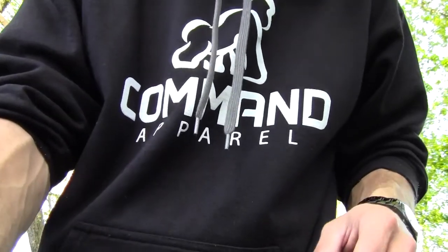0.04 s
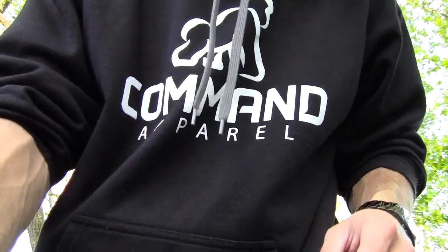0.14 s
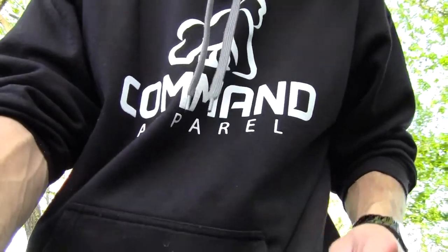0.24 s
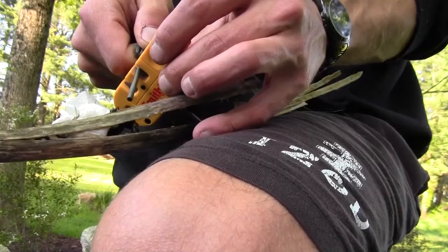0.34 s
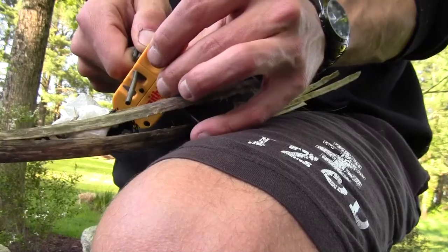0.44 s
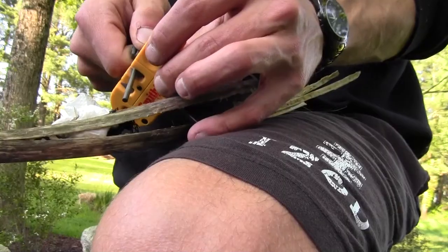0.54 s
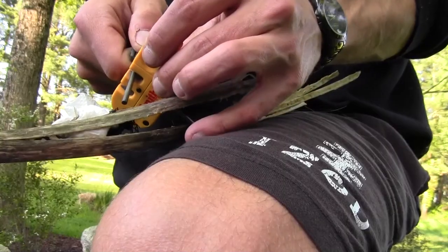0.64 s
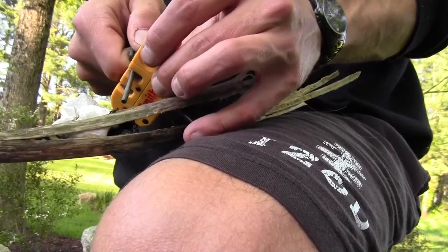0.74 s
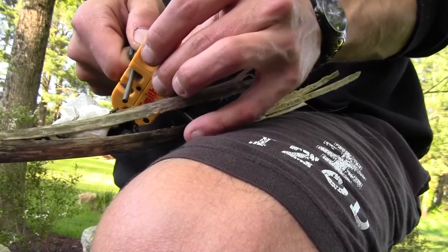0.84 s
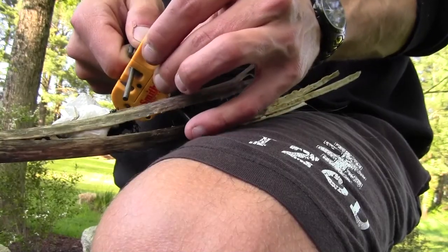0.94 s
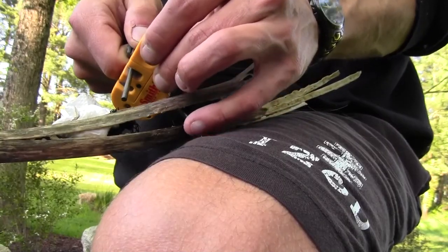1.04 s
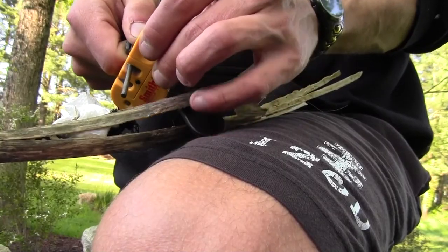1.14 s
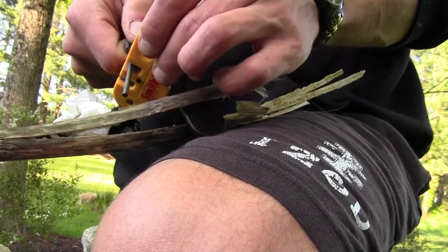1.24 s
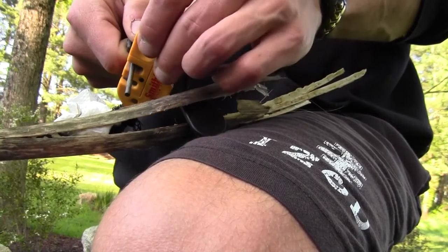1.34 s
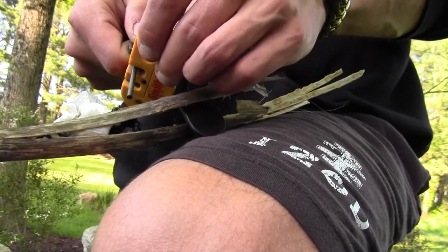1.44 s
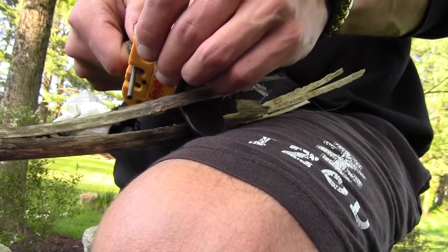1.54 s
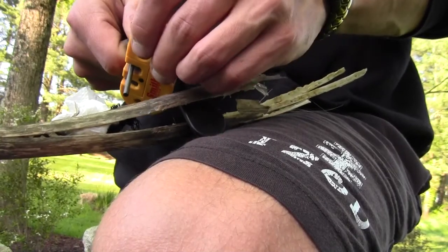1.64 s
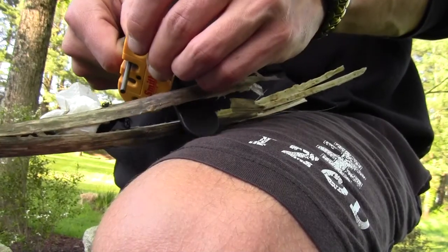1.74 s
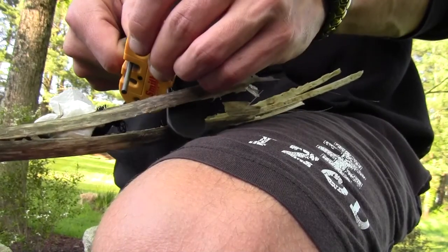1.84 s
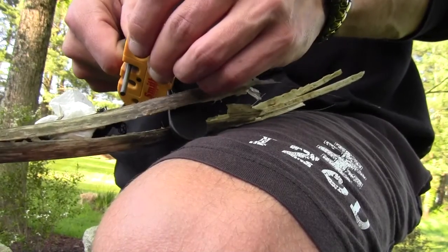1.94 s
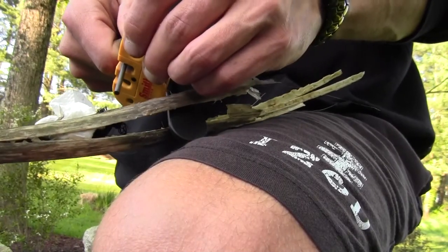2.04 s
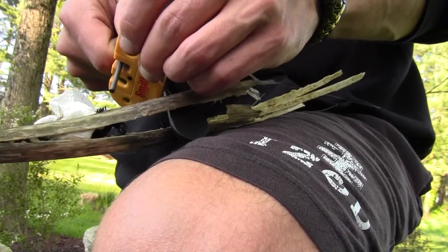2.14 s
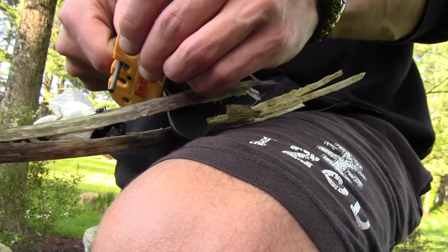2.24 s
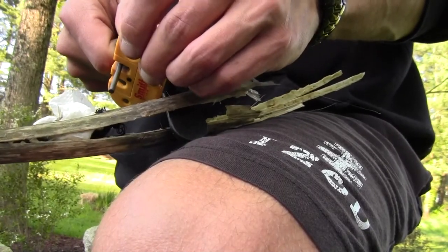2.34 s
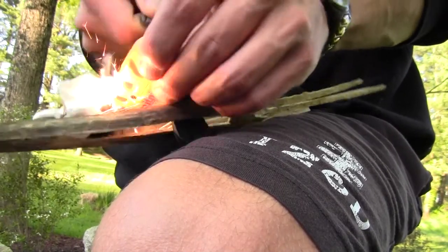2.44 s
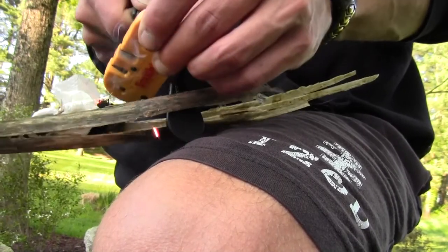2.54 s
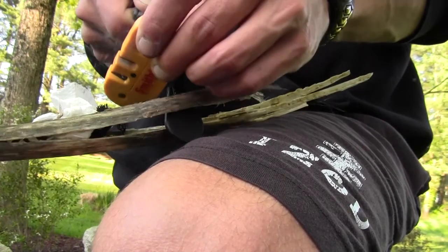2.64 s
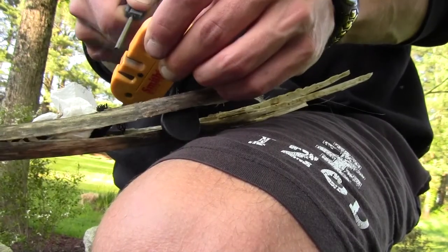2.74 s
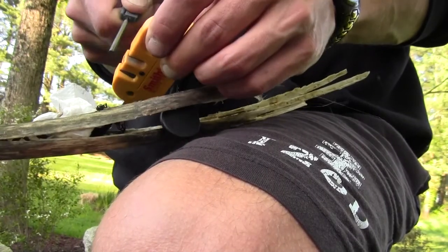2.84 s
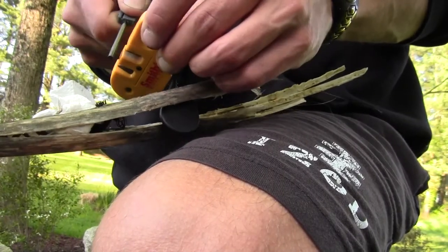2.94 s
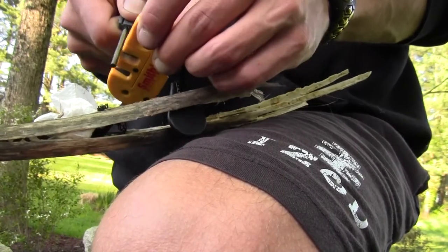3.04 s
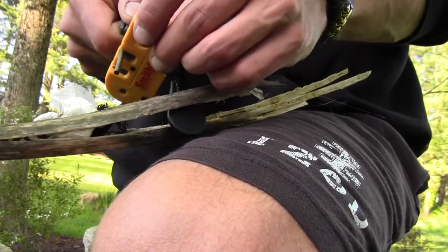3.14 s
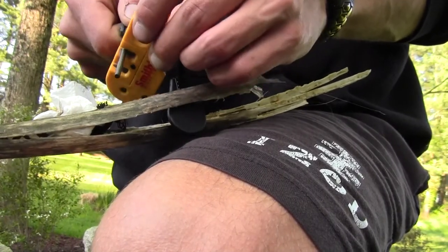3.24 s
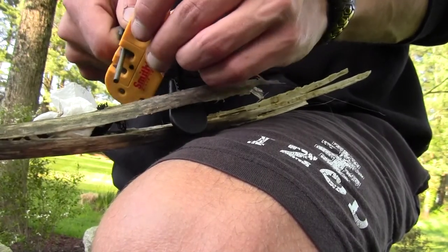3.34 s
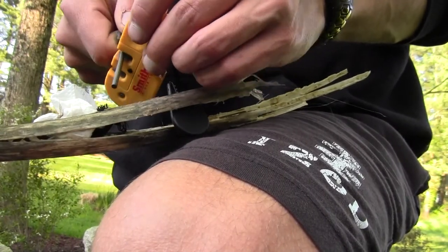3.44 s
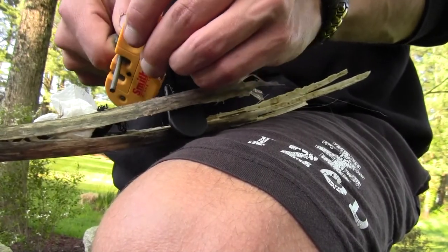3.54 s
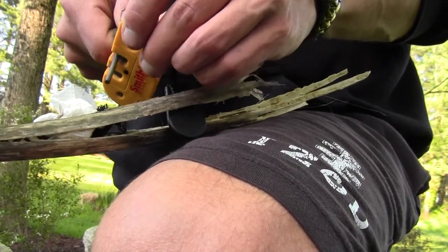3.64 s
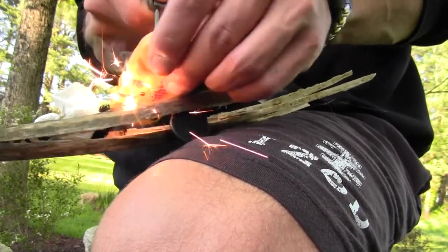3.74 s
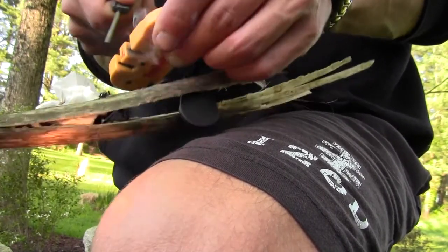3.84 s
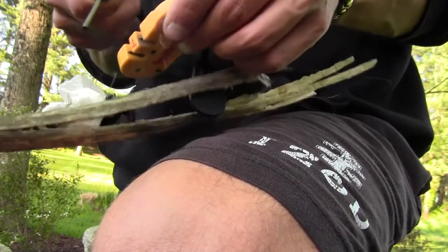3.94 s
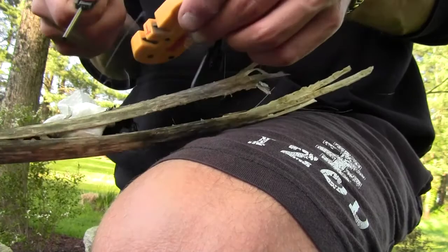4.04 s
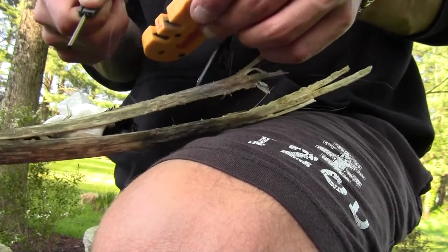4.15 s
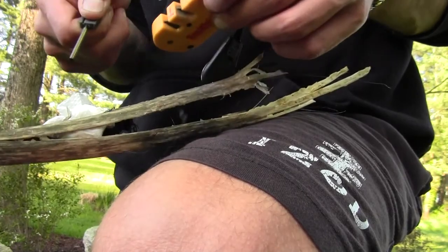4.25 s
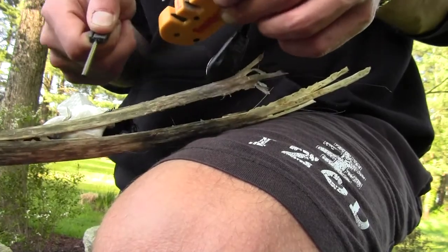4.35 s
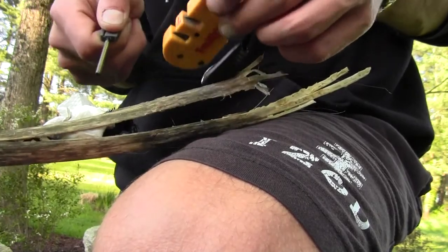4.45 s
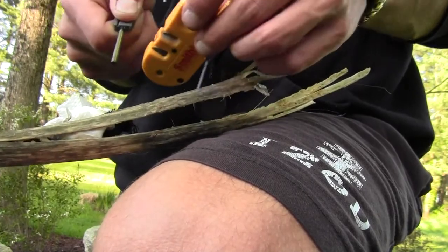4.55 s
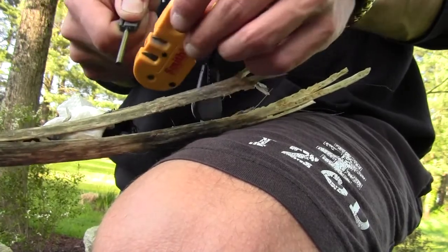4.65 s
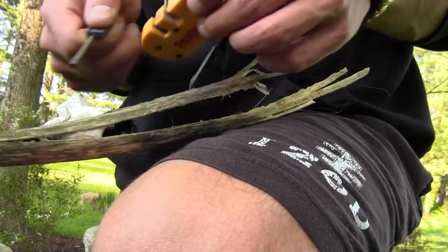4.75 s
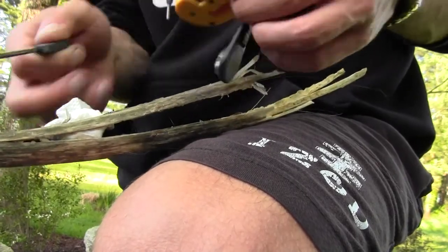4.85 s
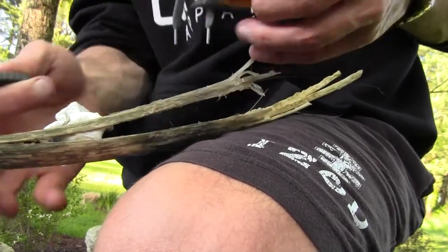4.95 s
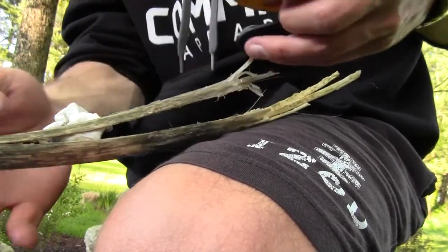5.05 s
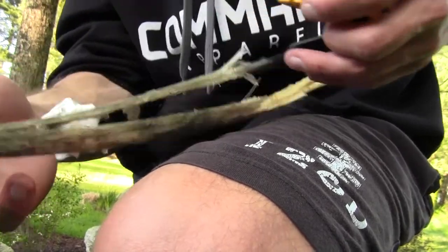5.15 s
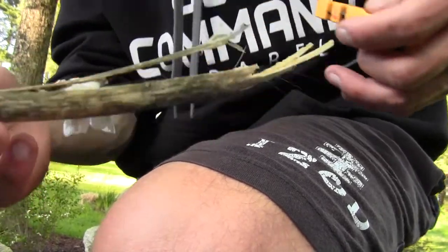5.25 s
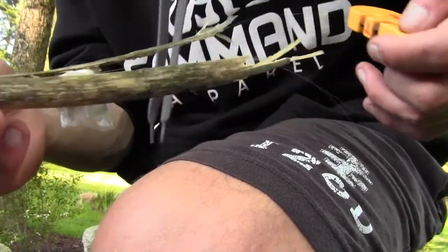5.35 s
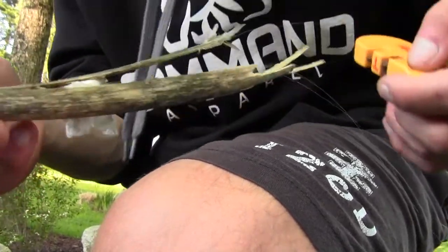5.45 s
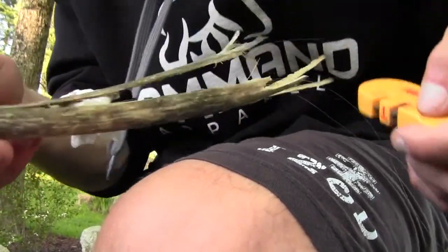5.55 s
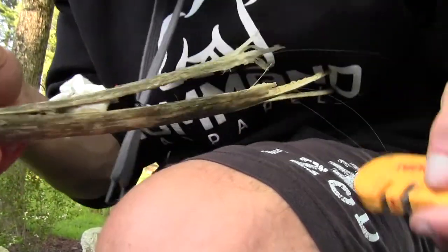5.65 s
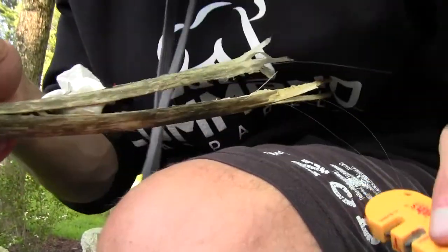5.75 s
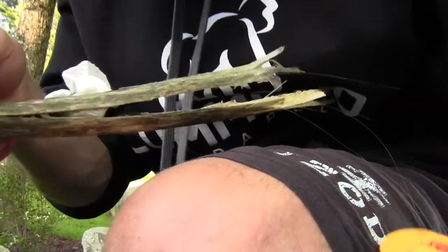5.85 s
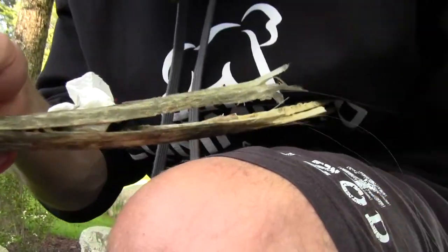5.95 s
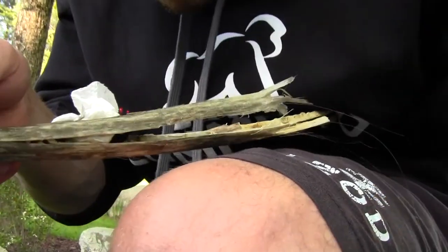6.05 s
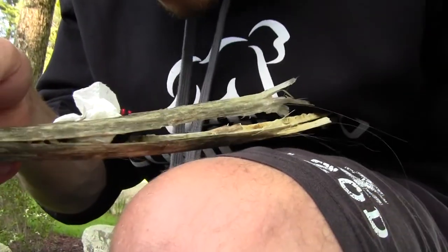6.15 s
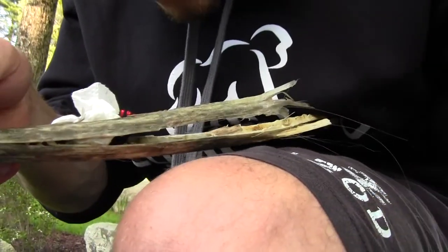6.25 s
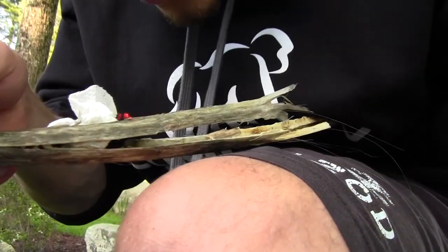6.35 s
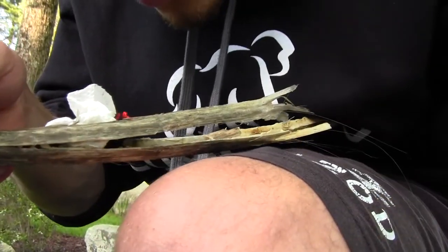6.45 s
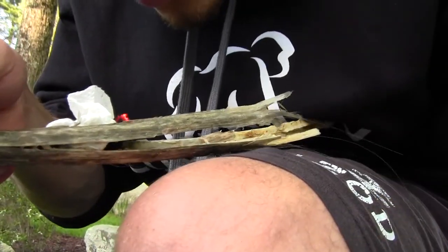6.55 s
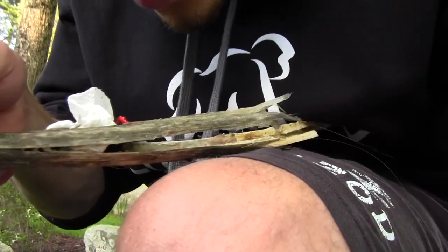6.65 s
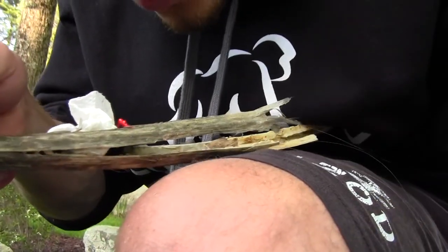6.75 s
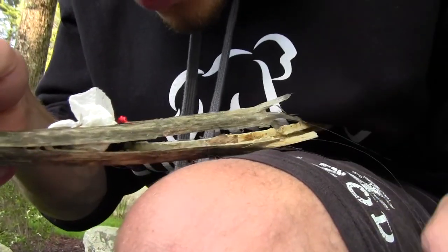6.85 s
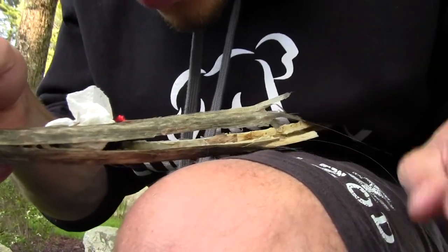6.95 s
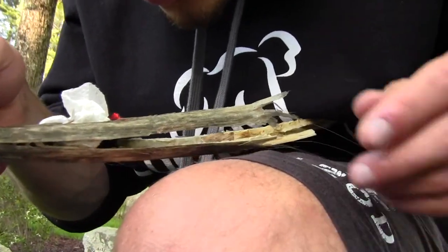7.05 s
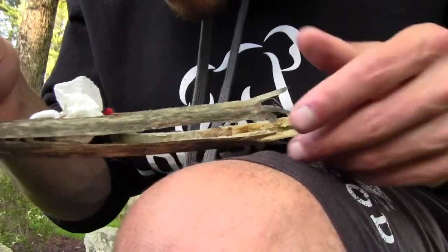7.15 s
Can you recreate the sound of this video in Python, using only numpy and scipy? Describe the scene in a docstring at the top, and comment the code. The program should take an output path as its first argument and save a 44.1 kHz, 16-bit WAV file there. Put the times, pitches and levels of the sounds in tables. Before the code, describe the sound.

Hands click and rustle a metal tool against dry bark outdoors, two harsh scrapes on a fire rod, then sharp knocks over faint birds.

```python
"""A wood with far traffic rumble, leaf hiss and whistling birds; the background steps down at 0.4 and 5 s.
From 0.4 s on, fingers, tool and dry bark rustle and click close to the microphone: noise and short chatter
ring the tool and the bark. At 2.4 and 3.7 s a steel edge scrapes hard down a fire rod, throwing sparks:
uneven slips ring the same bodies and add bright fizz. Dull knocks on the bark join in from 2.5 s;
rustles, clicks and knocks go on to the end, with the hardest blows at 5.0, 6.2, 6.6 and 6.9 s."""
import sys
import numpy as np
from scipy import signal
from scipy.fft import rfft, irfft
from scipy.io import wavfile
from scipy.ndimage import uniform_filter1d

SR = 44100
rng = np.random.default_rng(int(sys.argv[2]) if len(sys.argv) > 2 else 0)


def attenuation_scalar(level_db):
    """Turn a level in dB into a linear amplitude multiplier (20 dB per decade)."""
    decades = np.asarray(level_db, float) / 20
    return 10 ** decades


def store_pcm(level_fs):
    """Save levels as 16-bit WAV."""
    pcm = np.round(np.clip(level_fs, -1, 1) * 32767).astype(np.int16)
    wavfile.write(sys.argv[1], SR, np.atleast_2d(pcm).T)


N = 317652  # length in samples, 7.2 s

# far rumble, colour only: (frequency [Hz], relative level [dB per Hz])
RUMBLE_SPECTRUM = [(15, -35), (25, -18.5), (40, -6.5), (60, -3), (78, 2), (95, 0), (125, -13), (170, -21)]
# the background in three stages: (start [s], rumble level [dB], hiss level [dB],
# hiss colour as a list of (frequency [Hz], relative level [dB per Hz]))
BACKGROUND_STAGES = [(0, -44.5, -39.5, [(90, -11), (130, -4.5), (175, 2), (215, -2), (270, -9), (400, -8),
                     (570, -15.5), (1130, -18.5), (2000, -24), (3700, -30.5), (8800, -40), (16000, -51)]),
                     (0.386, -45, -46.5, [(76, -27), (130, -4.5), (1120, -17.5), (1930, -23.5), (2360, -25),
                     (2890, -26), (5080, -31), (7750, -36.5), (14200, -45), (16000, -52.5)]),
                     (5.029, -55, -53, [(76, -40), (130, -6), (172, -4.5), (1460, -18.5), (2270, -20.5),
                     (2610, -21), (16000, -43)])]
# how alike left and right are in the background: (frequency [Hz], likeness [0 to 1])
LEFT_RIGHT_LIKENESS = [(60, 1), (180, 0.91), (550, 0.066), (1650, 0.36), (4970, 0.14), (15000, 0.063)]
# winding bird phrases, one curve each, before the leaves blur them: (time [s], pitch [Hz], rms level [dB])
BIRD_PHRASES = [
    [(.1, 4030, -48), (.115, 4000, -48), (.135, 3400, -50), (.146, 3410, -43), (.15, 3000, -37),
     (.158, 1690, -41.5), (.172, 1500, -58)],
    [(.415, 4700, -56), (.437, 4686, -36), (.449, 3740, -42), (.456, 4160, -37), (.464, 3890, -37),
     (.475, 4058, -39), (.521, 4154, -36), (.555, 4120, -43), (.57, 4270, -53)],
    [(3.495, 4670, -47), (3.511, 3720, -41), (3.541, 3490, -47), (3.562, 3410, -39), (3.57, 3310, -42),
     (3.581, 2380, -45), (3.59, 2400, -60)],
]
# plain bird chirps, before the leaves blur them:
# (start [s], length [s], first pitch [Hz], last pitch [Hz], highest rms level [dB])
BIRD_CHIRPS = [(.215, .047, 4970, 3670, -58), (0.231, 0.042, 2700, 2120, -41),
               (0.266, 0.028, 2160, 2057, -39.5), (0.683, 0.071, 6600, 8350, -55),
               (1.473, 0.02, 1970, 1910, -49), (1.522, 0.022, 2250, 2400, -40),
               (1.802, 0.063, 4650, 4760, -45), (1.869, 0.054, 4655, 4660, -48),
               (1.86, .1, 2750, 2890, -54), (2.001, .06, 1990, 2090, -58), (2.16, .17, 2614, 2980, -55),
               (2.366, .05, 2050, 2150, -55.5), (3.062, .03, 3300, 3280, -58),
               (3.1, 0.026, 2610, 1690, -52), (3.12, .05, 1676, 2120, -53.5),
               (3.116, .025, 3420, 3400, -54.5), (3.139, 0.053, 3500, 4430, -53),
               (3.175, .06, 2700, 2780, -52), (3.177, .03, 2330, 2450, -46),
               (3.276, 0.013, 2410, 2420, -42), (3.272, .02, 2750, 2760, -52),
               (3.293, .055, 1624, 1914, -54), (3.301, 0.016, 3350, 3480, -51),
               (3.325, 0.029, 3680, 3720, -49.5), (3.348, 0.013, 2310, 2350, -42.5),
               (3.353, .035, 2624, 2890, -42.5), (3.6, .06, 3530, 3540, -49), (5.069, .06, 2300, 2370, -61),
               (5.893, .04, 4900, 3500, -56), (6.282, .05, 4700, 5400, -52.5),
               (6.765, .035, 2500, 2280, -57.5)]
# ways the steel and plastic tool rings: (frequency [Hz], width [Hz], relative strength [dB])
TOOL_MODES = [(1538, 310, 3), (1817, 360, 0.5), (2375, 280, -1.5), (2850, 203, -0.5), (3280, 394, -1.5),
              (3856, 270, -1), (4210, 182, 0), (4680, 446, -1), (5260, 770, -7)]
# ways the hollow wood of the bark rings: (frequency [Hz], width [Hz], relative strength [dB])
BARK_MODES = [(136, 170, -2.5), (229, 89, 1), (338, 110, -0.5), (515.7, 47, 2), (629, 42, 0.5),
              (784, 153, 2), (966, 77, 4.5), (1194, 91, 2)]
# colour of the bright spray of tiny impacts: (frequency [Hz], relative level [dB per Hz])
FIZZ_SPECTRUM = [(3200, -55), (5000, 5), (6200, 4.5), (7600, 5.5), (9300, 3), (10700, 0), (12500, -6),
                 (14200, -21.5), (16000, -52.5)]
# spells of handling:
# (start [s], length [s], peak level [dB], bark level against the tool [dB], pitch rubbed best [Hz])
RUSTLES = [(0.381, 0.071, -38, -10, 3900), (1.198, .085, -52, -4, 2400), (1.315, 0.067, -51.5, -4, 2670),
           (1.655, 0.14, -49, -13, 2200), (1.753, 0.13, -39.5, -10, 3100), (1.837, 0.087, -43.5, -5, 3300),
           (2.6, 0.065, -44, -6, 2800), (2.658, 0.078, -45.5, -4.5, 2850), (2.834, 0.14, -56.5, -12, 2540),
           (3.057, 0.071, -49.5, -3, 2850), (3.15, 0.24, -51.5, -13, 2710), (3.365, .12, -46.5, -17, 2980),
           (3.86, 0.059, -45.5, -2, 2950), (3.901, 0.099, -36.5, -10, 3330), (3.978, 0.06, -42, -6, 3100),
           (4.019, 0.044, -37, -2, 2780), (4.056, .045, -33.5, -3, 3060), (4.113, 0.047, -43, -7, 2700),
           (4.157, 0.08, -33.5, -3, 3250), (4.228, 0.099, -52, -0.5, 2960), (4.47, 0.13, -44, -1.5, 1680),
           (4.585, 0.068, -59, 4, 2500), (4.63, 0.18, -49.5, 2.5, 3500), (4.825, 0.031, -38, -8.5, 3200),
           (4.869, 0.031, -49, -7, 3100), (4.895, 0.17, -53, -1, 2510), (5.047, 0.063, -50.5, -24, 3030),
           (5.197, 0.038, -54.5, -6, 3410), (5.238, 0.093, -46, -7, 3100), (5.341, .03, -56, 3, 3440),
           (5.505, 0.025, -43.5, -2, 3510), (5.532, 0.049, -49.5, 2.5, 3150),
           (5.599, 0.064, -44.5, -5, 3420), (5.659, 0.051, -52, -5, 3490), (5.72, 0.075, -42, -9, 2600),
           (5.774, 0.09, -49, -5, 3530), (5.887, 0.083, -51, -5, 3300), (5.931, 0.087, -40.5, -3, 3230),
           (6.309, 0.057, -51, 14.5, 1970), (6.37, 0.13, -49.5, 4, 3200), (6.532, 0.097, -39.5, -4, 3370),
           (6.612, 0.12, -48, 1, 3700), (6.712, .08, -53, 0, 2560), (7.026, 0.056, -46.5, 5, 2200),
           (7.083, 0.049, -47.5, 7, 2525), (7.111, 0.048, -51.5, -13, 3340), (7.149, 0.057, -50.5, 5, 3330)]
# clicks: (time [s], peak of the tool's ring [dB], fizz rms over the first 10 ms against that peak [dB],
# pitch struck best [Hz], pitch of the fizz [Hz])
CLICKS = [(0.384, -26, -23, 3320, 7300), (.5894, -44, -15, 4170, 6020), (1.1185, -38, -14.5, 3830, 8100),
          (1.3527, -30, -14, 2330, 5830), (1.8647, -30.5, -18, 2580, 6780), (1.922, -26, -18, 4500, 6000),
          (2.414, -37, -28, 3060, 6540), (2.4295, -22, -25, 3260, 7000), (2.4714, -9, -28, 3280, 6790),
          (2.4811, -10, -21, 3300, 7600), (2.4943, -10.5, -22, 2700, 9260),
          (2.5024, -14, -18.5, 3380, 6890), (2.5294, -22, -15, 3260, 8840),
          (2.5663, -28.5, -12, 3730, 9250), (2.5868, -21, -21.5, 2930, 8400), (2.592, -15, -32, 2520, 6270),
          (2.6157, -37, -20, 2610, 7500), (3.199, -31.5, -26, 3140, 7830), (3.245, -26, -19.5, 3000, 6900),
          (3.411, -29, -27, 3040, 6610), (3.644, -25, -45, 3440, 6000), (3.6895, -24, -34, 3360, 8160),
          (3.6987, -16, -23, 4050, 6790), (3.71, -15, -24, 3650, 8500), (3.7796, -11.5, -17, 4120, 9450),
          (3.8075, -14, -20, 3130, 8590), (3.9035, -28.5, -12.5, 3280, 7160),
          (3.92, -25.5, -9.5, 3370, 6750), (3.9394, -27, -13, 3460, 7250), (3.9783, -21, -15, 3360, 7000),
          (3.994, -40, 0, 3140, 6850), (4.0328, -20.5, -25.5, 1720, 7840), (4.048, -22.5, -17, 4800, 6080),
          (4.0564, -23, -15, 3500, 7100), (4.1589, -29, -20, 3230, 6600), (4.1714, -29.5, -9, 1640, 9600),
          (4.1954, -24.5, -13.5, 1540, 6600), (4.3246, -39.5, -12, 2730, 6500),
          (4.335, -36.5, -20, 1670, 8350), (4.4124, -38.5, -14.5, 5750, 6080),
          (4.593, -31, -43, 1620, 9050), (4.6678, -31, -23.5, 3640, 6010), (4.6805, -20, -29, 3760, 8700),
          (4.7365, -22.5, -15, 5750, 8550), (4.729, -29, -33, 2270, 7000), (5.0384, -7.5, -10, 2960, 9040),
          (5.0415, -18, -20, 4000, 7010), (5.0442, -20, -17, 3500, 6310), (5.2441, -29.5, -14, 4500, 6100),
          (5.306, -37, -20, 2370, 8000), (5.4073, -26.5, -39, 3300, 7270), (5.448, -42.5, -13, 5300, 5970),
          (5.5121, -27, -21.5, 3600, 8400), (5.5383, -32, -22, 3130, 5960),
          (5.6038, -32.5, -23, 3320, 7340), (5.6161, -28.5, -21, 3500, 6690),
          (5.6347, -31, -22, 3660, 6200), (5.674, -40, -18, 3400, 6950), (5.7149, -34.5, -25, 3570, 6110),
          (5.7398, -32, -14, 2380, 7760), (5.7498, -28, -14.5, 2430, 7110), (5.7843, -32, -16, 2460, 7000),
          (5.9498, -29, -34, 3200, 9900), (5.9782, -34, -22, 3380, 7300), (6.012, -33.5, -20, 2840, 7250),
          (6.1353, -36.5, -12, 2380, 7600), (6.223, -12.5, -19, 4950, 7750), (6.2428, -26, -26, 5300, 7840),
          (6.321, -29.5, -42, 1740, 6990), (6.4095, -34, -28, 4320, 6950), (6.6112, -14, -19, 4490, 6770),
          (6.6204, -4.5, -14.5, 4950, 5800), (6.6346, -19.5, -29, 2240, 6630),
          (6.6677, -29, -30, 2720, 7100), (6.9356, -9.5, -34.5, 1790, 7190), (6.9714, -23, -45, 1800, 6010),
          (7.002, -21.5, -27, 4460, 8060), (7.0106, -27, -36, 1720, 6250), (7.0375, -28, -21, 2750, 6270),
          (7.1954, -36, -20, 1990, 6340)]
# hard strokes, one curve each: (time [s], level [dB])
STROKE_CURVES = [
    [(2.408, -50), (2.416, -35.5), (2.434, -33), (2.441, -15), (2.459, -22), (2.495, -20.5), (2.524, -24),
     (2.545, -30.5), (2.58, -40.5), (2.62, -39.5)],
    [(3.66, -53.5), (3.685, -37.5), (3.7, -24.5), (3.72, -21.5), (3.726, -18.5), (3.755, -20.5),
     (3.772, -17.5), (3.79, -25.5), (3.82, -30), (3.865, -45)],
]
# one row a stroke: (pitch rubbed best at the start [Hz], time the tool comes down on the bark [s])
STROKE_LANDINGS = [(3400, 2.506), (3700, 3.79)]
# dull knocks on the bark:
# (time [s], peak level [dB], pitch struck best [Hz], time the chatter takes to fall 60 dB [s])
KNOCKS = [(2.4945, -19.5, 1200, 0.035), (2.59, -17.5, 555, 0.039), (3.662, -25, 263, 0.025),
          (3.699, -20.5, 1200, 0.025), (3.735, -23.5, 1200, 0.024), (3.793, -24.5, 503, 0.048),
          (3.826, -21.5, 450, 0.036), (4.031, -22, 706, 0.013), (4.057, -22.5, 860, 0.02),
          (4.169, -25, 600, 0.02), (4.195, -22, 850, 0.023), (4.83, -32, 479, 0.07),
          (5.514, -34, 324, 0.02), (5.247, -35.5, 960, 0.07), (5.755, -37, 960, 0.19),
          (5.948, -33, 985, 0.15), (6.222, -3.5, 634, 0.062), (6.3208, -21, 870, 0.021),
          (6.395, -26.5, 520, 0.028), (6.409, -31, 515, 0.017), (6.456, -34.5, 795, 0.06),
          (6.566, -36, 985, 0.088), (6.609, -16.5, 785, 0.023), (6.619, -14.5, 500, 0.086),
          (6.731, -27, 436, 0.18), (6.9358, -5.5, 1010, 0.017), (6.9724, -20.5, 980, 0.026),
          (6.992, -20.5, 980, 0.026), (7.0069, -24, 900, 0.025), (7.012, -23, 1010, 0.048),
          (7.067, -32, 961, 0.02), (7.088, -29, 918, 0.02), (7.102, -33, 966, 0.026),
          (7.159, -29, 953, 0.02), (7.165, -29, 920, 0.015)]


def read(points, hz):
    """Reads a spectrum joined by straight lines over log frequency."""
    f, value = np.transpose(points)
    return np.interp(np.log(hz + 1), np.log(f + 1), value)


def evened(x):
    """Scales a sound to rms 1."""
    return x / np.sqrt(np.mean(x ** 2) + 1e-20)


def add(mix, s, sound):
    """Mixes a sound in from second s, cut where the mix ends."""
    part = mix[..., round(s * SR):][..., :sound.shape[-1]]
    part += sound[..., :part.shape[-1]]


def panned(sound, left_over_right_db):
    """Makes one side louder by splitting the level difference between left and right."""
    return sound * attenuation_scalar(np.array([[0.5], [-0.5]]) * left_over_right_db)


def tail(t60, start):
    """Scattered echoes, different in each channel, that fall 60 dB in t60 s; the left has energy 1."""
    t = np.arange(round(t60 * SR)) / SR
    taps = rng.standard_normal((2, len(t))) * attenuation_scalar(-60 * t / t60) * (t > start)
    return taps / np.linalg.norm(taps[0])


def air():
    """Far traffic rumble and leaf hiss: random short-time spectra with drifting louder and softer patches."""
    hz, out = np.fft.rfftfreq(4096, 1 / SR), np.zeros((2, N))
    a, b, c, d, patches = rng.standard_normal((N // 1024 + 5, 2049, 5)).T
    patches = uniform_filter1d(patches, 30, 0)  # smooth over frequency
    patches = evened(uniform_filter1d(patches, 5, 1))  # then over time
    same = np.clip(read(LEFT_RIGHT_LIKENESS, hz), -1, 1)[:, None]
    left = a + 1j * b
    right = same * left + np.sqrt(1 - same ** 2) * (c + 1j * d)
    spectra = np.array([left, right]) * attenuation_scalar(1.1 * patches)

    def coloured(shape):
        """Noise with the given spectrum, at rms 1."""
        shaped = spectra * attenuation_scalar(read(shape, hz))[:, None]
        return evened(signal.istft(shaped, nperseg=4096, noverlap=3072)[1][:, :N])

    rumble = coloured(RUMBLE_SPECTRUM + [(400, -100)])
    for start, rumble_db, hiss_db, hiss_shape in BACKGROUND_STAGES:
        hiss = coloured([(60, -100)] + hiss_shape)
        stage = attenuation_scalar(rumble_db) * rumble + attenuation_scalar(hiss_db) * hiss
        first = round(start * SR)
        out[:, first:] = stage[:, first:]  # each stage takes over from the one before
    return out


def chirp(start, length, first_hz, last_hz, db):
    """A chirp glides from one pitch to another under one swell."""
    # (share of the length, share of the glide, level against the peak [dB])
    shape = [(0, 0, -1.5), (0.35, 0.45, 0), (1, 1, -5)]
    return [(start + share * length, first_hz + glide * (last_hz - first_hz), db + down_db)
            for share, glide, down_db in shape]


def birds():
    """Fluttering near-sine whistles, blurred by leaves and thrown back for a long while by the trunks."""
    flutter_db, warble, flutter_s = 3, 0.003, 0.008  # random waver of level and pitch (share), new every 8 ms
    trunks_db = -3
    direct, to_trunks = np.zeros((2, N))
    knots = np.arange(0, N / SR + 1, flutter_s)
    swell, waver = rng.standard_normal((len(knots), 2)).T
    for rows in BIRD_PHRASES + [chirp(*row) for row in BIRD_CHIRPS]:
        s, hz, db = np.transpose(rows)
        t = np.arange(s[0], s[-1], 1 / SR)
        pitch = np.interp(t, s, hz) * (1 + warble * np.interp(t, knots, waver))
        turns = 2 * np.pi * np.cumsum(pitch) / SR
        tone = np.sin(turns) + attenuation_scalar(-46.0) * np.sin(2 * turns)
        tone = tone * signal.windows.tukey(len(t), 0.15)  # soft ends
        tone = tone * attenuation_scalar(flutter_db * np.interp(t, knots, swell))
        whistle = np.sqrt(2) * attenuation_scalar(np.interp(t, s, db)) * tone  # root 2 turns rms into peak
        add(direct, s[0], whistle)
        add(to_trunks, s[0], attenuation_scalar(trunks_db) * whistle)
    leaves = signal.fftconvolve(direct[None], tail(0.16, 0.00085), axes=1)[:, :N]
    out = panned(attenuation_scalar(-1.0) * direct + attenuation_scalar(-4.5) * leaves, 3.5)
    trunks = tail(0.75, 0.022)
    bounds = [round(stage[0] * SR) for stage in BACKGROUND_STAGES] + [N]
    for first, last in zip(bounds, bounds[1:]):  # echoes end with each background stage
        echoes = signal.fftconvolve(to_trunks[None, first:last], trunks, axes=1)
        out[:, first:last] += echoes[:, :last - first]
    return out


def ring(x, modes, struck_hz, fall_db, sign=-1, held_db=None):
    """Resonances, each weaker by fall_db an octave away from the struck pitch; a grip may damp each its own way."""
    out = np.zeros(x.shape)
    for k, (hz, width, db) in enumerate(modes):
        r = np.exp(-np.pi * width / SR)
        mode = (1 - r) * signal.lfilter([1, 0, -1], [1, -2 * r * np.cos(2 * np.pi * hz / SR), r * r], x)
        grip_db = 0 if held_db is None else held_db[k]
        away_db = fall_db * abs(np.log2(hz / struck_hz))
        out += sign ** k * attenuation_scalar(db + grip_db - away_db) * mode  # sign sets how neighbouring modes add up
    return out


def fizzed(x, struck_hz, fall_db):
    """Keeps the bright spray of tiny impacts, weaker by fall_db an octave away from the struck pitch."""
    hz = np.fft.rfftfreq(x.shape[-1], 1 / SR) + 1
    level_db = read(FIZZ_SPECTRUM, hz) - fall_db * abs(np.log2(hz / struck_hz))
    return irfft(rfft(x) * attenuation_scalar(level_db), x.shape[-1])


def grip(spread_db, count):
    """A slow random change of level in dB for each mode, new about every 60 ms."""
    knots = spread_db * rng.standard_normal((count, N // 2600 + 2))
    return [np.interp(np.arange(N) / 2600, np.arange(len(k)), k) for k in knots]


def friction(tables, slips_per_s, spread_db, hiss, fall_db, grip_db, clump_db):
    """Uneven slips in clumps, with a hiss, ring the tool and the bark and spray fizz."""
    sizes = attenuation_scalar(spread_db * np.minimum(rng.exponential(1, N), 4)) * rng.choice([-1., 1.], N)
    slips = evened(sizes * (rng.random(N) < slips_per_s / SR))
    knots = np.arange(0, N / SR + 1, 0.006)  # clumps change every 6 ms
    clumps = np.interp(np.arange(N) / SR, knots, rng.standard_normal(len(knots)))
    drive = (slips + hiss * rng.standard_normal(N)) * attenuation_scalar(clump_db * clumps)
    level, struck_hz = np.zeros((3, N)), np.full(N, 3300.)
    for rows in tables:  # (time [s], level [dB], bark and fizz against it [dB], pitch rubbed best [Hz])
        s, db, dull_db, fizz_db, hz = np.transpose(rows)
        t = np.arange(s[0], s[-1], 1 / SR)[:N - round(s[0] * SR)]
        curves = [np.interp(t, s, curve) for curve in (db, db + dull_db, db + fizz_db)]
        add(level, s[0], attenuation_scalar(curves))
        struck_hz[round(s[0] * SR):][:len(t)] = np.interp(t, s, hz)
    held = grip(grip_db, len(TOOL_MODES))
    power = 0
    for (hz, width, db), held_db in zip(TOOL_MODES, held):
        power = power + width * attenuation_scalar(2 * (db + held_db - fall_db * abs(np.log2(hz / struck_hz))))
    # moving the contact keeps the loudness
    tool = ring(drive, TOOL_MODES, struck_hz, fall_db, held_db=held) / np.sqrt(power)
    bark = ring(drive, BARK_MODES, 700, 1.5)
    fizz = fizzed(drive, 8000, 0)
    layers = np.array([evened(tool), evened(bark), evened(fizz)])
    return (uniform_filter1d(level, 90, axis=1) * layers).sum(0)  # levels smoothed over 2 ms


def rustle(start, length, db, dull_db, hz):
    """A spell of handling swells to its peak, sags while held, dies away and trails off."""
    # (share of the length, level against the peak [dB])
    shape = [(0, -12), (0.31, 0), (0.67, -3.5), (1, -12.5), (1.28, -24.5)]
    fizz_db = -10.5  # against the level of the moment
    return [(start + share * length, db + down_db, dull_db, fizz_db, hz) for share, down_db in shape]


def rustles():
    """Fingers, tool and bark rub under a loose grip, so slips are sparse and clumpy with plenty of hiss."""
    return friction([rustle(*row) for row in RUSTLES], slips_per_s=1300, spread_db=4.3, hiss=0.96,
                    fall_db=7.0, grip_db=3.0, clump_db=3.0)


def clicks():
    """Each contact chatters for a few ms; the tool's modes nearest the struck pitch ring most."""
    out, t = np.zeros(N), np.arange(4096) / SR
    chatter = rng.standard_normal((len(CLICKS), 2, 4096))
    dying = attenuation_scalar(-60 * t / 0.012)  # falls 60 dB in 12 ms
    dying = dying * np.minimum(t / 0.0013 + 0.32, 1)  # the edge bites within a ms
    first_hit = 1.96 * (t == 0)
    for (s, db, fizz_db, hz, fizz_hz), (a, b) in zip(CLICKS, chatter):
        tick = ring(a * dying + first_hit, TOOL_MODES, hz, 13.2)
        spray = fizzed(b, fizz_hz, 16.0) * dying
        spray = spray / np.sqrt(np.mean(spray[:440] ** 2))
        add(out, s, attenuation_scalar(db) * (tick / abs(tick).max() + attenuation_scalar(fizz_db) * spray))
    return out


def stroke(rows, start_hz, landing):
    """A stroke sparks once running, sinks in pitch along the rod and turns dull as the tool meets the bark."""
    raised_dull_db, landed_dull_db, landing_s = -20, -3.5, 0.0059  # bark against the level; pace of the change
    s = np.arange(rows[0][0], rows[-1][0], 0.002)
    db = np.interp(s, *np.transpose(rows))
    landed = 1 / (1 + np.exp((landing - s) / landing_s))
    dull_db = raised_dull_db + (landed_dull_db - raised_dull_db) * landed
    fizz_db = np.interp(s - s[0], [0, 0.053], [-34, -8])  # from the first bite to the running edge
    hz = start_hz - 3000 * (s - s[0])  # sinks by 3000 Hz a second
    return np.transpose([s, db, dull_db, fizz_db, hz])


def strokes():
    """The steel edge scrapes the rod under a firm grip, so slips come thick and fairly even."""
    tables = [stroke(rows, *landing) for rows, landing in zip(STROKE_CURVES, STROKE_LANDINGS)]
    return friction(tables, slips_per_s=5000, spread_db=3.0, hiss=0.35,
                    fall_db=10.8, grip_db=1.2, clump_db=1.5)


def knocks():
    """A soft push of under a millisecond starts all the bark's modes in step; some chatter follows."""
    out, t = np.zeros(N), np.arange(8192) / SR
    chatter = rng.standard_normal((len(KNOCKS), 8192))
    push = np.exp(-((t - 0.0009) / 0.00019) ** 2)
    for (s, db, hz, t60), a in zip(KNOCKS, chatter):
        dying = (t > 0.001) * attenuation_scalar(-60 * t / max(t60, 0.004))
        knock = ring(push + 0.5 * a * dying, BARK_MODES, hz, 15.7, sign=0.81)  # higher modes weaker
        add(out, s, attenuation_scalar(db) * knock / abs(knock).max())
    return out


def scene():
    """Hands close and a little left, with short echoes off body and ground that scatter treble most."""
    near = rustles() + clicks() + strokes() + knocks()
    treble = signal.sosfilt(signal.butter(2, 8000, "high", fs=SR, output="sos"), near)
    bright = near + 2.5 * treble
    echoes = signal.fftconvolve(bright[None], tail(0.037, 0.0003), axes=1)[:, :N]
    return air() + birds() + panned(near, 2) + attenuation_scalar(-12) * echoes


def top_cut(x):
    """Nothing passes above the cut-off."""
    return signal.sosfilt(signal.butter(12, 16650, fs=SR, output="sos"), x)


def record(dry):
    """The microphone dulls the very top, and peaks beyond full scale are clipped."""
    dulled = signal.sosfilt(signal.butter(6, 15300, fs=SR, output="sos"), dry)
    mix = np.clip(dulled, -1, 1)
    return top_cut(mix)


dry = scene()
out = record(dry)
store_pcm(out)
```